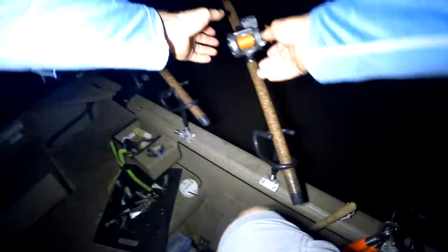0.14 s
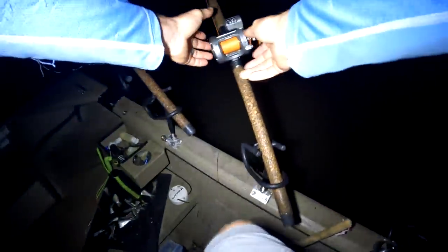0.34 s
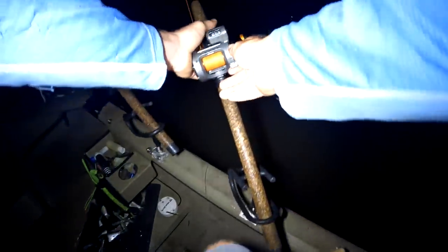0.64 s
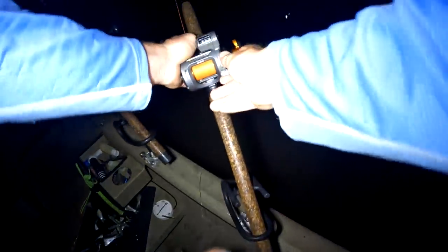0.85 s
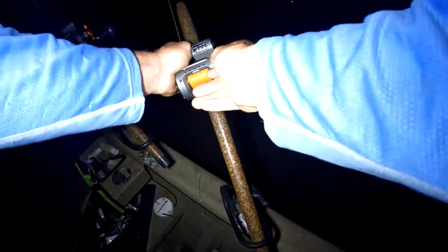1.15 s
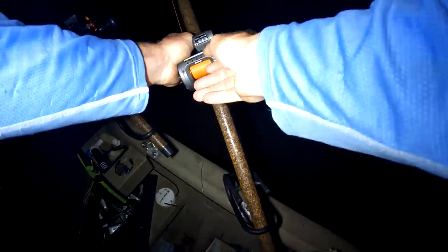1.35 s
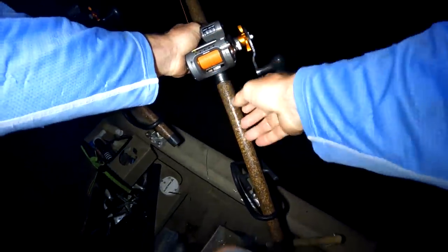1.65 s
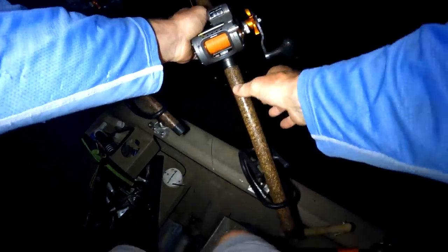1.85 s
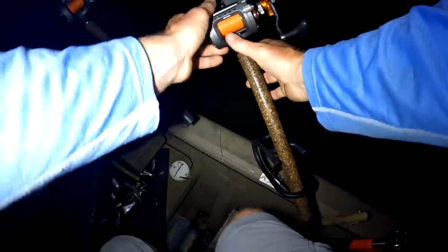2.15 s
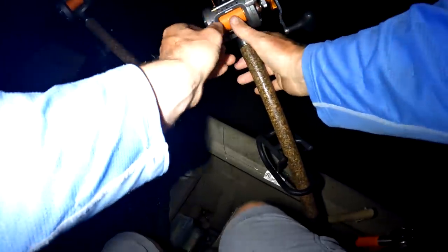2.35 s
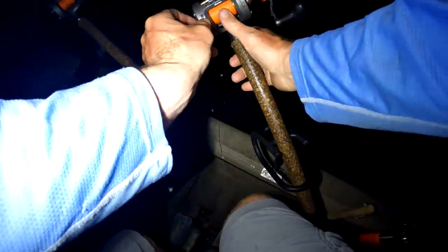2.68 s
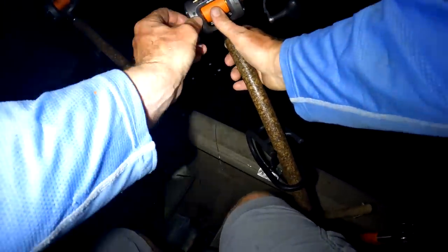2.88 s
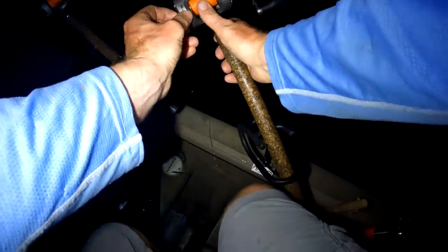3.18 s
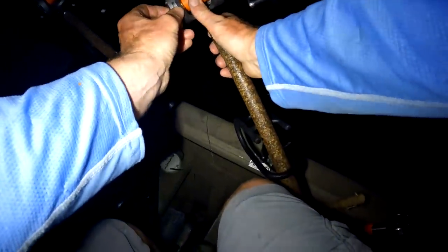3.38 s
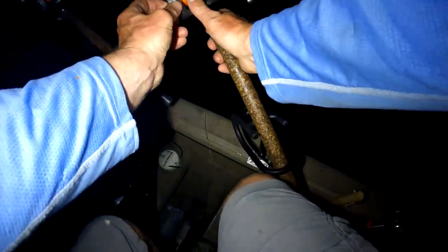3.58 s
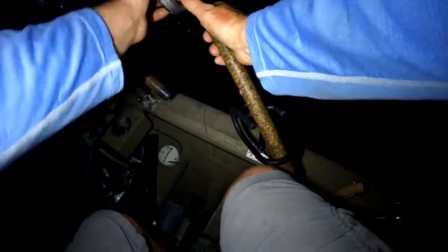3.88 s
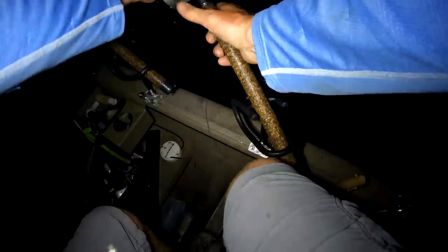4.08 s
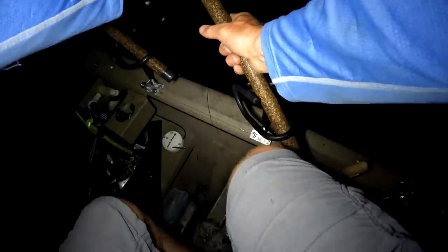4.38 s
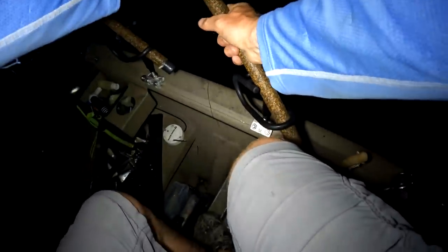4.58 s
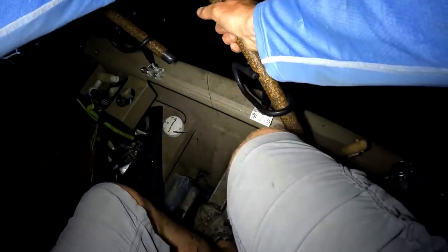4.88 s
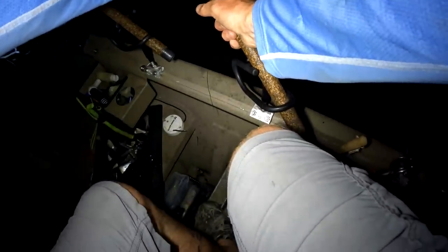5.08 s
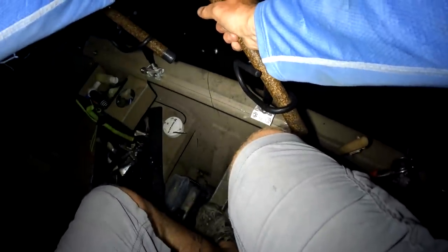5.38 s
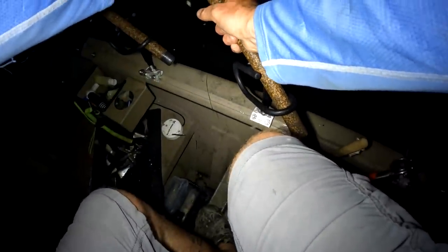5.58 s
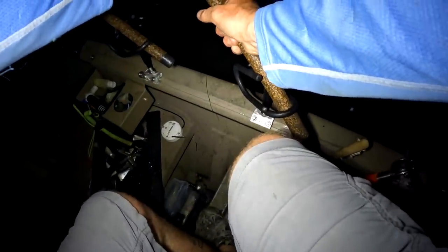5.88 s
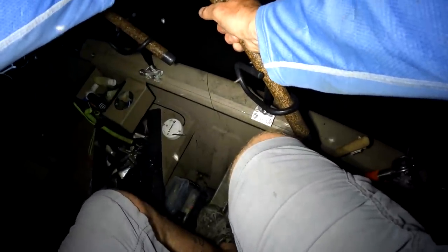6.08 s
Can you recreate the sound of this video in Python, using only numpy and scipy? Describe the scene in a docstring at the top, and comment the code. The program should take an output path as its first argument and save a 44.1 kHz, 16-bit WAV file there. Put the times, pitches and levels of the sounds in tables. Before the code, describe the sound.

A quiet night outdoors on a small boat, heard close to the hands: low rumble, soft airy rush, faint hiss and a distant low engine drone. Right away three sharp reel clicks fall within 0.1 s, then a light tick at 0.2. From 0.43 to 0.67 the clicker runs quickly, about fourteen bright, hard metallic snaps in a tight, accelerating rattle. Soft ticks follow at 0.77 and 0.95, and a lever clacks at 1.05. Two loud lone snaps come at 1.23 and 1.38, with a tiny tinkle at 1.4. A brief rub at 1.65 and a tap near 2.0 follow. Faint high cricket chirps, starting around 0.8, repeat in short pulsed groups to the end. At 3.5 gears knock once, fairly firmly, with a short boat-deck tail. Very faint cloth rubs pass around 4.2, and a dull tick at 4.8. From about 4.1 the motor sags in pitch, fading by 6.2.

```python
"""Night on a small fishing boat, over air noise, far drones and an engine drone.
First the reel's clicker pawl snaps over ratchet teeth, singly and then in one quick run; light ticks follow.
An insect starts chirping on the bank, a lever clacks over, two lone teeth snap and a fitting tinkles.
Hands and sleeves rub (shaped noise), then gears knock; struck parts are noise cracks plus decaying modes.
Late on the engine eases off: its sine orders sag in pitch and, at the end, fade."""
import sys
import numpy as np
from scipy import signal
from scipy.fft import rfft, irfft, next_fast_len
from scipy.io import wavfile

SR = 44100
rng = np.random.default_rng(int(sys.argv[2]) if len(sys.argv) > 2 else 0)


def transcribe(signal):
    """Save signal, clipped to [-1, 1], as a 16-bit WAV file at the path in sys.argv[1]."""
    frames = np.atleast_2d(signal).T
    limited = np.clip(frames, -1, 1)
    pcm = np.round(limited * 32767).astype(np.int16)
    wavfile.write(sys.argv[1], SR, pcm)


N = 274919
TIME = np.arange(N) / SR
HIT_TIME = TIME[:SR // 4]


def from_db(db):
    """Decibels to amplitude gain."""
    return 10 ** (np.asarray(db) / 20)


def rms_one(x):
    """Scale to unit power."""
    return x / np.sqrt(np.mean(x ** 2) + 1e-20)


def in_time(rows):
    """Interpolate each column of a time curve at every sample."""
    s, *columns = np.transpose(rows)
    return [np.interp(TIME, s, column) for column in columns]


def add(out, s, sound):
    """Mix a sound in from time s."""
    start = max(0, int(s * SR))
    out[start:start + len(sound)] += sound[:max(0, N - start)]


def noise(spectrum, size):
    """Unit-power noise shaped by (f/Hz, level/dB) rows, rolled off beyond the end rows."""
    hz, db = np.transpose(spectrum)
    fft_size = next_fast_len(size)
    f = np.maximum(np.fft.rfftfreq(fft_size, 1 / SR), 1)
    shape = from_db(np.interp(np.log(f), np.log(hz), db))
    rolloff = np.minimum(1, np.minimum(f / hz[0], hz[-1] / f)) ** 2
    white = rfft(rng.standard_normal(fft_size))
    return rms_one(irfft(white * shape * rolloff, fft_size)[:size])


def drift(knots_per_s):
    """Slow random curve: unit-spread knots joined by straight lines."""
    knots = rng.standard_normal(1024)
    return np.interp(TIME * knots_per_s, np.arange(len(knots)), knots)


def dying(t60_s):
    """Exponential decay of a struck thing."""
    return from_db(-60 * HIT_TIME / t60_s)


def ring(modes, pitch=1, scatter_db=2.37, detune=0.0027):
    """One blow: decaying sine modes, neighbours in opposite sense, level and pitch scattered per blow."""
    hz, db, t60_s = np.transpose(modes)[:, :, None]
    luck = rng.standard_normal((2, len(modes), 1))
    sense = (-1) ** np.arange(len(modes))[:, None]
    t = HIT_TIME[:SR // 12]
    level_db = db + scatter_db * luck[0] - 60 * t / t60_s
    mode_hz = hz * pitch * (1 + detune * luck[1])
    onset = 1 - np.exp(-t / 0.00016)
    return np.sum(sense * from_db(level_db) * np.sin(2 * np.pi * mode_hz * t), 0) * onset


def burst(spectrum, t60_s):
    """Crack of a contact: countless weak modes dying together, as decaying noise."""
    onset = 1 - np.exp(-HIT_TIME / 0.0002)
    return noise(spectrum, size=len(HIT_TIME)) * dying(t60_s) * onset


def swishes(rows, grain_db):
    """Bands of noise that swell and sink along a half sine, with a fine random grain."""
    out, t = np.zeros(N), TIME[:SR]
    for middle_s, length_s, db, hz, octaves in rows:
        edge = 2 ** (octaves / 2)
        grain_knots = rng.standard_normal(400)
        grain = from_db(grain_db * np.interp(t, np.linspace(0, 1, 400), grain_knots))
        stroke = np.sin(np.pi * np.minimum(t / length_s, 1))
        band = [(hz / edge / 1.4, -20), (hz / edge, -3), (hz, 0), (hz * edge, -4), (hz * edge * 1.08, -16)]
        add(out, middle_s - length_s / 2, from_db(db) * stroke * grain * noise(band, size=SR))
    return out


# pawl dropping off a tooth: t/s, level/dB
TOOTH_DROPS = [(0.0216, -9), (0.0536, -8), (0.0928, -7), (0.4271, -2.5), (0.455, -1.5), (0.4759, -3.5),
               (0.4935, -3), (0.5103, -2), (0.5265, -3.5), (0.5407, -3.5), (0.5557, -6), (0.5705, -5),
               (0.5849, -2.5), (0.5989, -4), (0.614, -1), (0.6316, -2), (0.6668, -2.5), (1.2336, -0.5),
               (1.3767, -2.5)]
# pawl spring modes before the pitch factor: f/Hz, level/dB, t60/s
PAWL_MODES = [(6320, -5.5, 0.012), (6700, -1, 0.015), (7080, -11, 0.011), (7600, -16.5, 0.011)]
# reel frame modes: f/Hz, level/dB, t60/s
FRAME_MODES = [(1136, -22, 0.0243), (1315, -17.5, 0.026), (1530, -17, 0.014), (1863, -27, 0.03),
               (2384, -15.5, 0.026), (2590, -23.5, 0.022), (2942, -22.5, 0.019), (3220, -24, 0.01614),
               (4032, -32.5, 0.01794), (4340, -23, .018), (4950, -22.5, 0.018), (5265, -8.5, 0.012),
               (8240, -20, 0.0087), (10350, -13.5, 0.012), (12100, -17, 0.0064), (12900, -22, .007),
               (14900, -21, .006)]
# colour of the tooth crack: f/Hz, relative level/dB
TOOTH_CRACK = [(600, -19.5), (850, -5.5), (1250, 10), (1750, -7), (2600, 2.5), (3300, 0), (3800, -6),
               (4800, -1.5), (6600, 0), (7800, 1), (9200, -9), (10500, -10), (13000, -3), (15500, -8.5)]
RUN_TEETH_PER_S = 53.2  # full speed
PAWL_DB, FRAME_DB, LONE_PITCH = -4.5, -7.5, 1.025  # pitch factor towards zero speed
# added at full speed: spring flatter, frame shaken harder, stronger rebound
RUN_FLATTENING, RUN_FRAME_DB, RUN_REBOUND_DB = 0.031, 6, 6


def clicker(crack_db=-12, crack_t60_s=0.026, rebound_s=0.0021, rebound_db=-15, drag_db=-38):
    """Pawl cracks onto each tooth, rings spring and frame, rebounds once; spool speed sets the colour."""
    out, starts = np.zeros(N), np.array(TOOTH_DROPS)[:, 0]
    gaps = np.diff(starts)
    nearest_gap = np.minimum(np.r_[gaps[0], gaps], np.r_[gaps, gaps[-1]])
    speeds = np.minimum(1 / (nearest_gap * RUN_TEETH_PER_S), 1)
    for (s, db), speed in zip(TOOTH_DROPS, speeds):
        spring = from_db(db + PAWL_DB) * ring(PAWL_MODES, LONE_PITCH - RUN_FLATTENING * speed)
        frame = from_db(db + FRAME_DB + RUN_FRAME_DB * speed) * ring(FRAME_MODES)
        snap = spring + frame
        rebound = from_db(rebound_db + RUN_REBOUND_DB * speed) * snap
        add(out, s, snap)
        add(out, s + rebound_s * rng.uniform(0.66, 1.5), rebound)
        add(out, s, from_db(db + crack_db) * burst(TOOTH_CRACK, crack_t60_s))
    # while teeth follow quickly, the pawl scrapes up the flank of each
    teeth_per_s = np.interp(TIME, starts[1:] - gaps / 2, 1 / gaps, left=0, right=0)
    running = np.clip(teeth_per_s / RUN_TEETH_PER_S, 0, 1) ** 4
    scrape = noise([(900, -1.5), (2500, 0), (7000, -2.0), (15500, -4)], size=N)
    return out + from_db(drag_db) * running * scrape


# colour of the crack at a stop: f/Hz, relative level/dB
STOP_CRACK = [(300, -16.5), (600, 2.5), (1200, 2), (3200, -4), (4800, -2), (6600, 0), (8600, -9),
              (12000, -6), (15500, -12)]


def clack(s, db, modes, crack_db, crack_t60_s, rebound_s, rebound_db):
    """A part of the reel hits its stop with a crack, rings and bounces once."""
    out = np.zeros(N)
    add(out, s, from_db(db) * ring(modes))
    add(out, s + rebound_s, from_db(db + rebound_db) * ring(modes))
    add(out, s, from_db(db + crack_db) * burst(STOP_CRACK, crack_t60_s))
    return out


# thumb lever modes: f/Hz, level/dB, t60/s
LEVER_MODES = [(553, -14.5, 0.091), (1640, 2.5, 0.0076), (3050, 0.5, 0.0086), (3630, -2, 0.01),
               (4030, -1.5, 0.0082), (5760, -3.5, 0.0083), (6950, -2, 0.014), (7500, -13, .008),
               (11700, -0.5, 0.0032), (14100, -4, .005)]
LEVER_S, LEVER_DB = 1.0507, -17


def lever():
    """Thumb lever flips over against its stop."""
    return clack(LEVER_S, LEVER_DB, LEVER_MODES, crack_db=-6.5, crack_t60_s=0.017,
                 rebound_s=0.000914, rebound_db=-7.5)


# gear housing and rod modes: f/Hz, level/dB, t60/s
HOUSING_MODES = [(536, -19, 0.08), (634, -18, 0.071), (980, -9.5, 0.021), (1258, -8, 0.02),
                 (1763, -7, 0.011), (2940, -5.5, 0.018), (4030, -12, 0.012), (5080, -7, 0.018),
                 (6210, 3.5, 0.0127), (6440, 4.5, 0.016), (6830, 4, 0.011), (10850, -8.5, 0.0069)]
KNOCK_S, KNOCK_DB = 3.4910, -13


def gears():
    """Gears engage with a knock that rings the housing and rod."""
    return clack(KNOCK_S, KNOCK_DB, HOUSING_MODES, crack_db=-4.5, crack_t60_s=0.024,
                 rebound_s=0.0022, rebound_db=-8)


# light touches on the tackle: t/s, level/dB, colour f/Hz
TICKS = [(0.2184, -35, 3600), (0.768, -35, 2800), (0.9407, -38.5, 2300), (0.979, -44, 3500),
         (1.5913, -43, 2520), (1.9758, -30.5, 2370), (4.7983, -34.5, 1300)]
# hand and sleeve rubs: middle t/s, length/s, level/dB, centre f/Hz, width/octaves
RUBS = [(1.652, .038, -41, 2280, 1.33), (2.012, 0.046, -61, 8800, .7), (2.42, 0.35, -67.5, 3202, 0.25),
        (4.14, 0.31, -65.5, 9960, 2.5), (4.32, 0.067, -65.5, 4440, 0.78)]
# modes of a fitting on the reel: f/Hz, level/dB, t60/s
TINKLE_MODES = [(5900, -3, .08), (8100, -6, .07), (11300, -10, 0.062)]
TINKLE_S, TINKLE_DB = 1.4, -51


def handling(tick_t60_s=0.015, tick_fall_db=-15):
    """Fingers tap the tackle, skin and cloth slide over it, a fitting tinkles once."""
    out = swishes(RUBS, grain_db=3.0)
    for s, db, hz in TICKS:
        colour = [(hz / 2.6, -3), (hz, 0), (hz * 1.15, -8), (hz * 1.93, tick_fall_db)]
        add(out, s, from_db(db) * burst(colour, tick_t60_s))
    add(out, TINKLE_S, from_db(TINKLE_DB) * ring(TINKLE_MODES))
    return out


def boat(x, wet_db=-21, t60_s=0.088):
    """Hull and deck scatter a short, slightly dull tail: convolution with decaying noise."""
    colour = [(400, 1.5), (4500, 8.5), (6500, 0.5), (9000, 0.5), (16000, -4.5)]
    tail = burst(colour, t60_s) * np.minimum(HIT_TIME / 0.005, 1)
    return x + from_db(wet_db) * signal.fftconvolve(x, tail / np.linalg.norm(tail))[:N]


# insect chirps: middle of first wing stroke t/s, strokes/count
CHIRPS = [(0.77, 4), (1.702, 3), (1.952, 4), (2.252, 4), (2.627, 4), (2.955, 4), (3.279, 2), (4.119, 4),
          (4.652, 4), (4.943, 4), (5.221, 3), (5.524, 4), (5.818, 4), (6.135, 3)]
CHIRP_DB, STROKE_GAP_S = -60, 0.0413


def insects(stroke_hz=5340, fall_hz_per_s=19000, stroke_s=0.0049, echo_s=0.007, echo_db=-8, chorus_db=-77):
    """Wing strokes are short falling whistles echoed off the bank; far insects merge into a thin band."""
    out, t = np.zeros(N), TIME[:SR // 20] - 1 / 40
    for start, strokes in CHIRPS:
        luck = rng.standard_normal((6, 2))
        for k in range(strokes):
            hz = stroke_hz + 35 * luck[k, 0] - fall_hz_per_s * t
            swell = from_db(CHIRP_DB + luck[k, 1]) * np.exp(-(t / stroke_s) ** 2 / 2)
            whistle = swell * np.sin(2 * np.pi * np.cumsum(hz) / SR)
            whistle_s = start + k * STROKE_GAP_S + t[0]
            add(out, whistle_s, whistle)
            add(out, whistle_s + echo_s, from_db(echo_db) * whistle)
    chorus = noise([(4400, -21), (4950, 2), (5250, 1), (5700, -27.5)], size=N)
    return out + from_db(chorus_db + 2 * drift(9)) * chorus


# engine drone over the water, before order level and waver: t/s, level/dB
ENGINE_LEVEL = [(0.0, -40), (0.05, -42), (0.47, -44.5), (1.25, -38.5), (1.34, -48.5), (1.89, -43.5),
                (4.02, -46.5), (4.62, -42), (6.23, -55)]
# engine orders: multiple of firing rate, relative level/dB
ENGINE_ORDERS = [(.5, -5.5), (1, 0), (2, -16)]
# other far drones: in t/s, out t/s, f/Hz, level/dB
DRONES = [(0, 3.6, 183, -50), (3.5, 5.15, 282, -52), (2.5, 6.6, 238, -53.5), (1.5, 5.55, 124, -53)]
ENGINE_HZ, EASE_OFF_S, SAG_HZ_PER_S = 102.8, 4.1, 2.1  # steady until EASE_OFF_S, then sinking


def engines(waver_db=2, wander_hz=1.2):
    """Far motors: only low orders carry over the water, as sines wavering on the way."""
    hz = ENGINE_HZ - SAG_HZ_PER_S * np.maximum(TIME - EASE_OFF_S, 0)
    db, = in_time(ENGINE_LEVEL)
    turn = 2 * np.pi * np.cumsum(hz) / SR
    out = np.zeros(N)
    for order, order_db in ENGINE_ORDERS:
        gain = from_db(db + order_db + waver_db * drift(7.8))
        out += gain * np.sin(order * turn + 0.3 * drift(8.7))
    for start, end, tone_hz, tone_db in DRONES:
        fade = np.clip(np.minimum(TIME - start, end - TIME) / 0.38, 0, 1)
        gain = fade * from_db(tone_db + waver_db * drift(4.2))
        phase = 2 * np.pi * np.cumsum(tone_hz + wander_hz * drift(4)) / SR
        out += gain * np.sin(phase)
    return out


# night air before the band trims: t/s, rumble level/dB, middle level/dB, hiss level/dB
AIR_LEVEL = [(0.0, -37, -47, -63.5), (1.32, -41.5, -50.5, -70), (2.72, -40.5, -51.5, -72.5),
             (5.0, -44, -52.5, -71.5), (6.23, -46.5, -53.5, -72)]
# colour of each band: f/Hz, relative level/dB
RUMBLE_COLOUR = [(20, -6.5), (30, -9.5), (52, -1), (80, -7.5), (110, -6.5), (145, -12.5), (200, -11.5),
                 (260, -16.5), (400, -19), (700, -26)]
AIR_COLOUR = [(400, -9.5), (700, -6), (900, 3), (1150, 1.5), (1450, -4), (1800, -10.5), (2300, -13.5),
              (3000, -17.5), (3500, -16.5), (4200, -26), (5100, -25.5), (6200, -29.5), (8000, -33)]
HISS_COLOUR = [(4000, -2), (7000, -2), (10000, -2.5), (16000, -7)]
# swells in the distant rush: middle t/s, length/s, level/dB, centre f/Hz, width/octaves
SWELLS = [(2.8, 0.35, -48.5, 396, 0.47), (3.25, 0.52, -56, 1230, .35), (4.7, .65, -52.5, 1300, .35),
          (5.3, 0.65, -58, 504.6, 0.37)]


def night(rumble_db=-1.0, air_db=-0.5, hiss_db=0):
    """Low rumble, soft far-off rush with swells, faint hiss: three shaped noises on level curves."""
    low_db, middle_db, high_db = in_time(AIR_LEVEL)
    rumble = from_db(low_db + rumble_db) * noise(RUMBLE_COLOUR, size=N)
    rush = from_db(middle_db + air_db) * noise(AIR_COLOUR, size=N)
    hiss = from_db(high_db + hiss_db) * noise(HISS_COLOUR, size=N)
    return rumble + rush + hiss + swishes(SWELLS, grain_db=0.0)


def scene():
    """Sum the sources into two nearly equal channels; only handled tackle gets the boat's tail."""
    mid = boat(clicker() + lever() + gears() + handling()) + insects() + engines() + night()
    # channels differ most in the treble (gradient), plus a little noise of opposite sign
    side = from_db(-42.5) * mid + from_db(-30.0) * np.gradient(mid)
    side += from_db(-85.5) * noise(RUMBLE_COLOUR, size=N) + from_db(-80) * noise(HISS_COLOUR, size=N)
    return np.array([mid + side, mid - side])


CUTOFF_HZ = 15900


def record(dry):
    """Round the peaks, let the microphone's bias offset settle, cut the top."""
    rounded = 0.87 * np.tanh(dry / 0.82)
    offset = -0.195 * np.exp(-TIME / 0.85)
    lowpass = signal.ellip(10, 0.2, 80, CUTOFF_HZ, fs=SR, output="sos")
    return signal.sosfilt(lowpass, rounded + offset)


dry = scene()
out = record(dry)
transcribe(out)
```